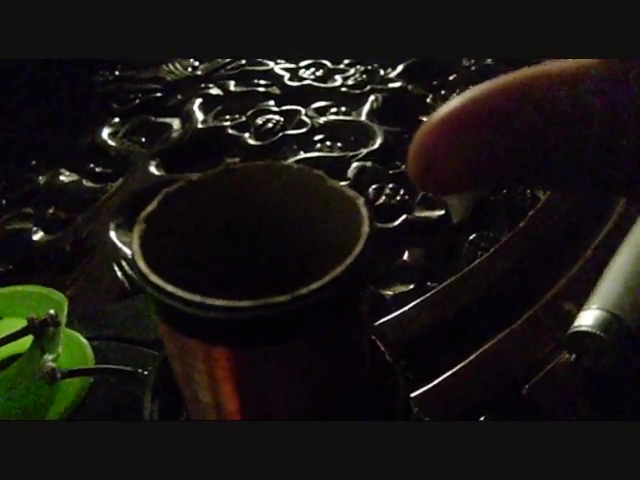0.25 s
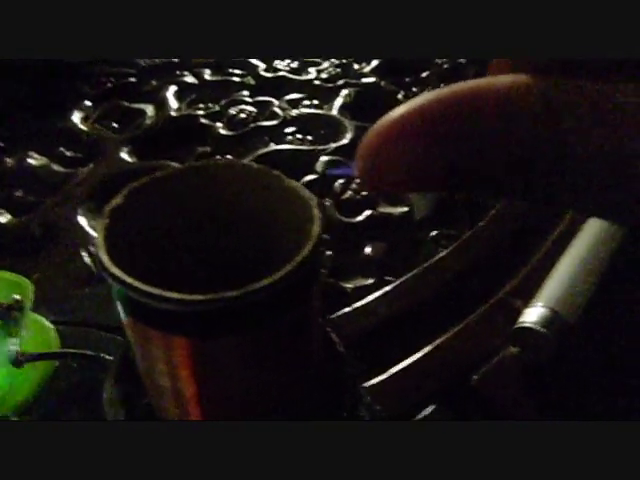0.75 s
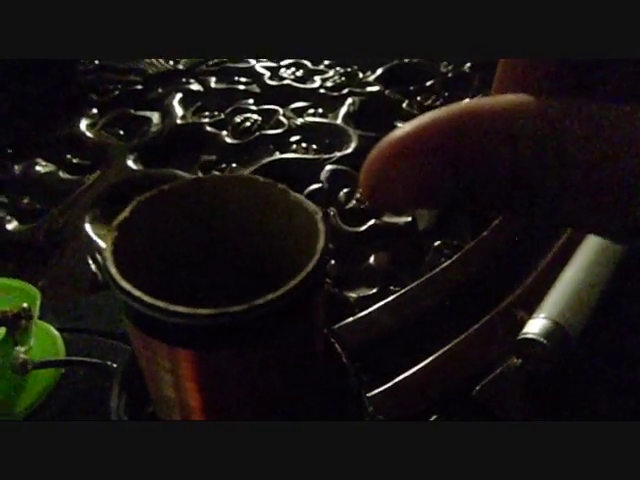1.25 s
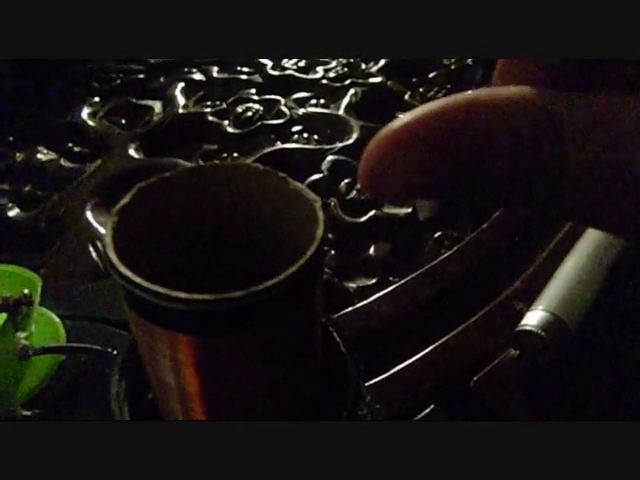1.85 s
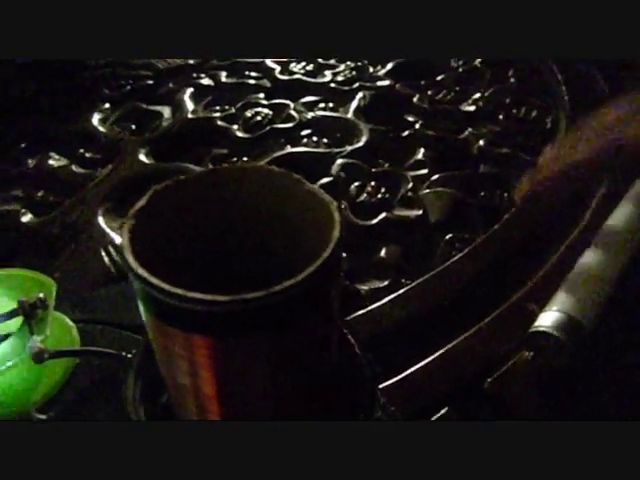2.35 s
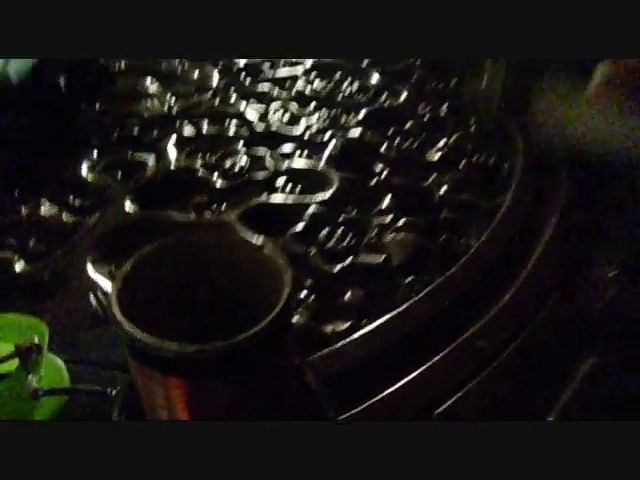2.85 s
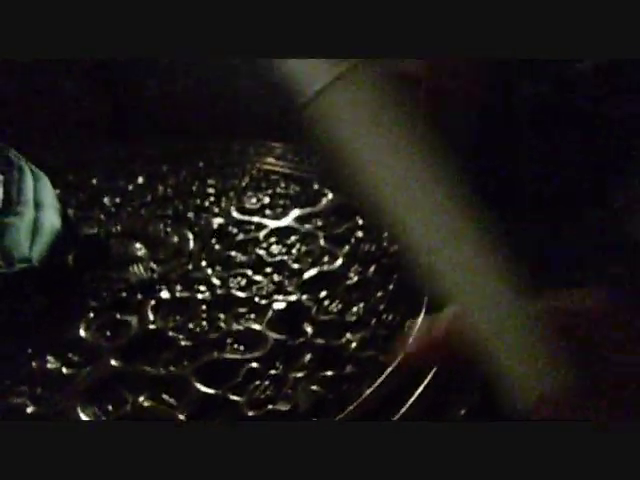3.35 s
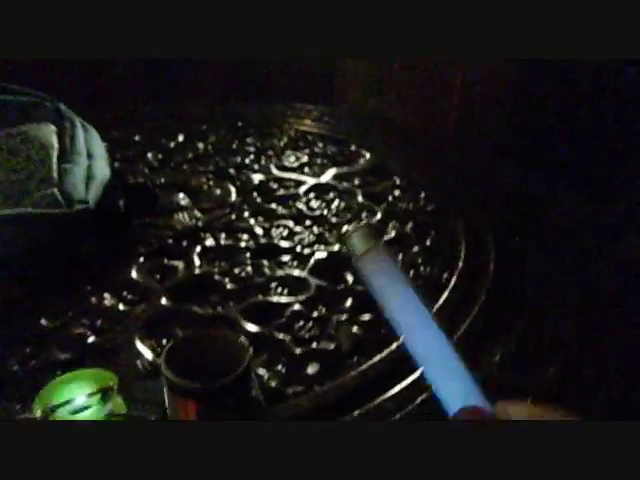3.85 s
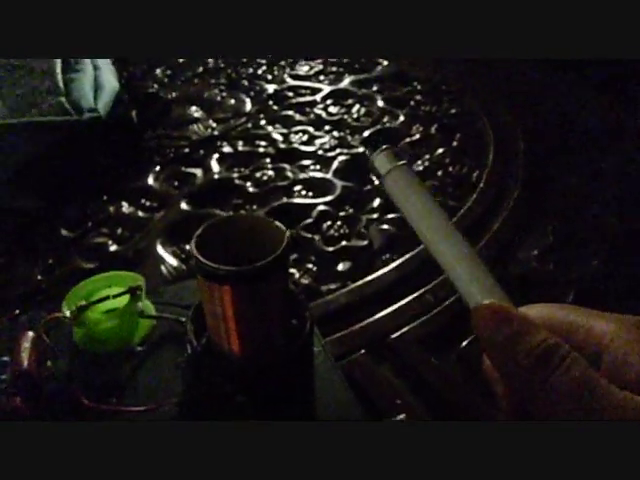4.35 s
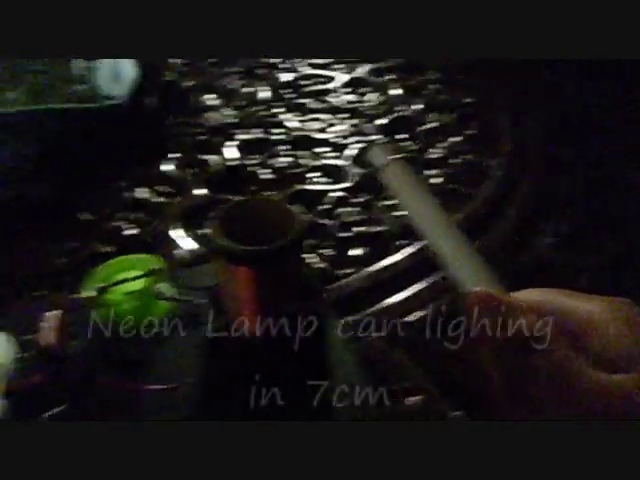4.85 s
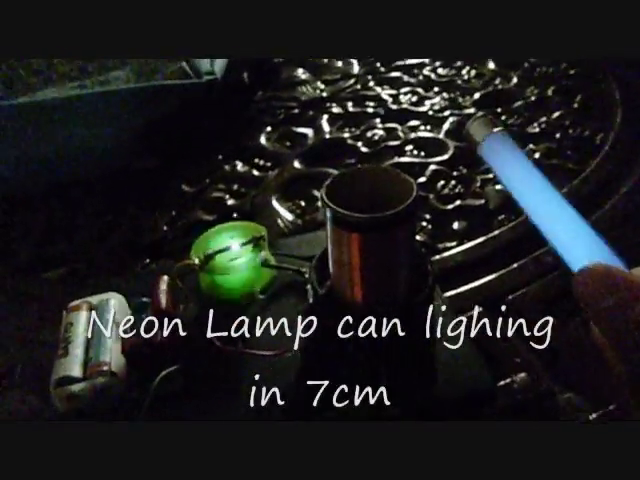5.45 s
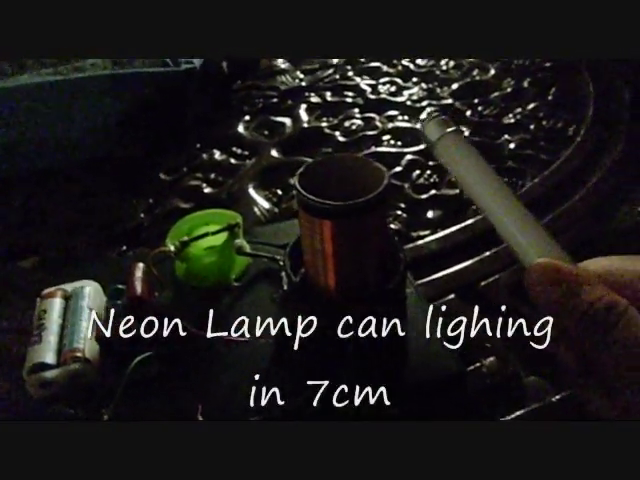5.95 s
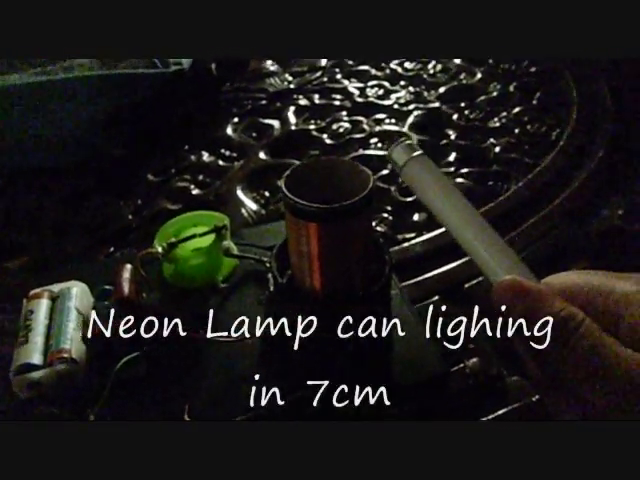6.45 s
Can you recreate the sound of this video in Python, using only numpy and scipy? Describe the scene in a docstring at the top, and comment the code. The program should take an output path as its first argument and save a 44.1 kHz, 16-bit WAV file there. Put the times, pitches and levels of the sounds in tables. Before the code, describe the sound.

A small spark coil on a metal tray snaps throughout, close to the microphone in a small quiet room: hard, bright, very short cracks at an even pace of nearly seven per second, slightly varied in colour, each with a high tubular ring, scattered near echoes and a brief hissy room tail. Low rumble and a soft airy motor whirr with faint wavering tones lie far beneath. From 2 s the whirr runs down, gone soon after 3 s. Soft hand bumps and a brushing rustle come at 1.9-2.4 s, then a cluster of light, hollow knocks at 2.5-2.7 s as a lamp tube is lifted, with tiny fingertip ticks at 3.0-3.5 s. From about 3.3 s the cracks are mostly weaker as the microphone draws back, apart from stronger ones near 3.7-3.9 s; they are softest after 6 s. A faint drone swells near 5 s, and a tiny rising creak comes at 5.6 s.

```python
"""Hard, bright cracks about seven times a second: a small spark coil on a metal tray, close to a camera.
Each crack is a shaped impulse that rings the mouth of the coil tube and bounces off the tray, with
scattered echoes from clutter, a wall and a small room. Beneath lie noise rumble, a faint drone and a
motor whirr (noise and wavering tones) that runs down from two seconds on. A lamp tube is picked up with
light knocks (decaying modes), a hand rustles and something creaks while the camera draws back."""
import sys
import numpy as np
from scipy import signal
from scipy.fft import rfft, irfft
from scipy.io import wavfile

SR = 44100
rng = np.random.default_rng(int(sys.argv[2]) if len(sys.argv) > 2 else 0)


def transcribe(u):
    """Save the signal u as a 16-bit wav file named by the first command-line argument.

    u: samples, shape (n,) or (channels, n), limited to [-1, 1]; the rate is SR.
    q: integer samples, one column per channel.
    """
    v = np.clip(np.atleast_2d(u).T, -1, 1)
    q = np.round(v * 32767).astype(np.int16)
    wavfile.write(sys.argv[1], SR, q)


N = 296352
TIME = np.arange(N) / SR


def gain_of(db):
    """Decibels to amplitude."""
    return 10 ** (np.asarray(db) / 20)


def evened(x):
    """Scales to rms 1."""
    return x / np.sqrt(np.mean(x ** 2) + 1e-20)


def faded(x):
    """Lets the second half of a short sound die to nothing."""
    return x * np.minimum(np.linspace(2, 0, len(x)), 1) ** 4


def read(points, hz, axis=1):
    """One column of a spectrum table, interpolated on a log-frequency axis."""
    columns = np.transpose(points)
    return np.interp(np.log(hz + 1), np.log(columns[0] + 1), columns[axis])


def follow(points, s):
    """All columns of a curve at the times s, in a list."""
    times, *columns = np.transpose(points)
    return [np.interp(s, times, c) for c in columns]


def add(mix, s, sound):
    """Mixes a sound in at time s, cut off where the mix ends."""
    part = mix[round(s * SR):][:len(sound)]
    part += sound[:len(part)]


def causal(db):
    """Minimum-phase spectrum: these gains, with all ringing after the start."""
    log_gain = np.log(gain_of(np.r_[db, db[-2:0:-1]]))
    return np.exp(np.conj(signal.hilbert(log_gain)))[:len(db)]


def coloured(x, points):
    """Filters a sound by the gains of a spectrum table."""
    hz = np.fft.rfftfreq(len(x), 1 / SR)
    return irfft(rfft(x) * causal(read(points, hz)), len(x))


def wander(rate_hz):
    """Random drift of rms 1: noise with little above rate_hz."""
    hz = np.fft.rfftfreq(N, 1 / SR)
    return evened(irfft(rfft(rng.standard_normal(N)) / (1 + (hz / rate_hz) ** 4), N))


def wavering(hz, sway_hz, rate_hz):
    """A sine whose pitch strays at random, by sway_hz rms."""
    pitch_hz = hz + sway_hz * wander(rate_hz)
    return np.sin(2 * np.pi * np.cumsum(pitch_hz) / SR)


def scatter(delay, t60, size=4096):
    """A dying cluster of random echoes, of energy 1; delay and t60 in s."""
    t = np.arange(size) / SR - delay
    echoes = rng.standard_normal(size) * (t > 0) * gain_of(-60 * abs(t) / t60)
    return echoes / np.linalg.norm(echoes)


def background():
    """Low room rumble of coloured noise, and a faint wavering drone that swells toward the end."""
    # colour of the still room: pitch_hz, relative density_db [dB per Hz]
    floor = [(15, -1), (45, 2), (64, 0), (110, -10.5), (170, -8), (250, -16), (330, -19), (900, -29.5),
             (3000, -24.5), (8000, -30), (16000, -48)]
    # rumble, stronger at first: time_s, level_db [rms, before its random drift]
    rumble_curve = [(0, -53), (.3, -53.5), (1, -53), (1.9, -57.5), (2.3, -57), (3.3, -57.5), (6.7, -60.5)]
    # drone: time_s, level_db [peak]
    drone_curve = [(0, -87), (4.5, -78), (5, -68), (6.7, -69)]
    noise = evened(coloured(rng.standard_normal(N), floor))
    rumble = noise * gain_of(follow(rumble_curve, TIME)[0] + 0.94 * wander(1.4))
    drone = gain_of(follow(drone_curve, TIME)[0]) * wavering(167, sway_hz=10.2, rate_hz=73.5)
    return rumble + drone


def motor():
    """Rushing air with a few wavering tones, fading ever faster as the motor runs down."""
    # colour of the rushing air: pitch_hz, relative density_db [dB per Hz]
    whirr = [(25, 13), (40, 6), (60, -11), (120, -17.5), (350, 2.5), (520, -4.5), (1100, 0.5), (1850, 4),
             (2650, -3.5), (3200, -2), (4500, -3), (7000, -6.5), (9500, -20), (15000, -28)]
    # tones: pitch_hz, level_db [rms, before random drift], sway_hz [rms]
    tone_list = [(41.3, -59.5, 3.4), (187, -67, 3.3), (349, -62.5, 8.16), (717, -63, 5), (907, -67, 2.2),
                 (1080, -66.5, 4.4), (1660, -71.5, 7.7), (1883, -63, 2.26)]
    air_db = -46.5  # rms
    off_s, rundown_s = 1.98, 1.29  # runs evenly, then loses 60 dB within the run-down time
    sound = gain_of(air_db) * evened(coloured(rng.standard_normal(N), whirr))
    for hz, db, sway in tone_list:
        level = gain_of(db + 2.7 * wander(4.7)) * np.sqrt(2)  # rms to peak
        sound += level * wavering(hz, sway_hz=sway, rate_hz=10.46)
    running_db = -60 * (np.maximum(TIME - off_s, 0) / rundown_s) ** 2
    return sound * gain_of(running_db)


def creak():
    """Uneven slipping: a faint, rough tone that climbs quickly, swells and dies away."""
    start_s, length_s, level_db = 5.57, 0.23, -63
    start_hz, end_hz, rise_s = 394, 635, 0.033
    t = np.clip(TIME - start_s, 0, length_s)
    hz = end_hz + (start_hz - end_hz) * np.exp(-t / rise_s)
    swell = np.sin(np.pi * np.sqrt(t / length_s))
    roughness = 1 + 1.2 * wander(70)
    return gain_of(level_db) * swell * roughness * wavering(hz, sway_hz=29.8, rate_hz=99)


def hand():
    """Short swells of narrow noise as the hand moves."""
    # soft bumps and a brush: start_s, length_s, centre_hz, width_hz, level_db [rms]
    rustles = [(1.928, 0.083, 316, 25, -51.5), (2.072, 0.19, 5600, 2030, -48.5),
               (2.43, 0.32, 193, 25, -58.5)]
    out, hz = np.zeros(N), np.fft.rfftfreq(SR, 1 / SR)
    for s, length, centre_hz, width_hz, db in rustles:
        band = 1 / (1 + (2 * (hz - centre_hz) / width_hz) ** 2)
        noise = irfft(rfft(rng.standard_normal(SR)) * band)[:round(length * SR)]
        swell = np.sin(np.pi * np.linspace(0, 1, len(noise)) ** 0.37)  # peaks early
        add(out, s, gain_of(db) * evened(noise * swell))
    return out


def lamp():
    """Light knocks ring the modes of lamp and tray; fingertip ticks are bright and damped."""
    # handling: start_s, relative level_db, treble tilt_db [per octave], free [factor on ring times]
    knocks = [(2.47, -37, 0.5, 1), (2.593, -39.5, -5.5, 0.61), (2.610, -41.5, -6, 0.8),
              (2.674, -42, 2, 0.51), (3.036, -70, 17, .25), (3.378, -54, -12.5, 0.24),
              (3.462, -72, 18, 0.25), (3.492, -72.5, 17.5, 0.25)]
    # modes of lamp and tray: pitch_hz, relative level_db, t60_s [before the factor above]
    modes = [(209, -14, 0.3), (436, -8, 0.18), (579, 4, 0.14), (680, 2, 0.1), (1003, 2, 0.21),
             (1050, 9.5, 0.071), (1240, 11, 0.059), (1690, -8, 0.07), (1990, 1, .045), (2300, -4, 0.065),
             (2840, 6, .04), (3100, 4, .045), (3710, -2, 0.046), (4500, 2, 0.041)]
    out, t = np.zeros(N), np.arange(SR // 3) / SR
    for s, db, tilt_db, free in knocks:
        ring = np.zeros(len(t))
        for k, (hz, mode_db, t60) in enumerate(modes):
            sign = (-1) ** k  # neighbouring modes start in opposite directions
            decay_db = mode_db + tilt_db * np.log2(hz / 1000) - 60 * t / (t60 * free)
            ring += sign * gain_of(decay_db) * np.sin(2 * np.pi * hz * t)
        rattle = coloured(scatter(0, 0.075 * free), [
            (100, -19 - 2 * tilt_db), (800, 9.5), (2800, 2.5 + 1.25 * tilt_db),
            (6000, -20 + 2 * tilt_db), (10500, -13), (15000, -29)])
        add(out, s, gain_of(db - 7) * ring)
        add(out, s, gain_of(db + 30.5) * faded(rattle))
    return out


def room(s, size=16384):
    """The room's answer to the spark at time s: a bounce off the nearest wall and a diffuse tail."""
    # what the room gives back: pitch_hz, level_db, t60_s
    room_tail = [(152, -26.5, 0.48), (1190, -19, 0.29), (2420, -14.5, 0.26), (3600, -6, 0.3),
                 (4080, -15.5, 0.24), (6100, -6, 0.31), (7500, -4.5, 0.27), (8940, -4, 0.27),
                 (11150, -12, 0.26), (15500, -15.5, 0.21)]
    # nearest wall's echo as the camera moves: time_s, delay_ms, level_db [before the room's colour]
    wall_path = [(0, 10.4, -2), (2.1, 11.9, -0.5), (2.5, 12, 1), (3.1, 11.9, -4.5), (6.7, 12, 1)]
    hz, t, z = signal.stft(rng.standard_normal(size), SR, nperseg=256)
    t60 = np.maximum(read(room_tail, hz, axis=2), .02)[:, None]
    # each band of noise decays at its own rate, with equal energy
    z *= gain_of(-60 * t / t60) * np.sqrt(2 * np.log(10 ** 3) / (t60 * SR))
    tail = signal.istft(z, SR, nperseg=256)[1][:size]
    tail *= np.minimum(np.arange(size) / SR / 0.017, 1)  # builds up over 17 ms
    delay_ms, wall_db = follow(wall_path, s)
    wall = coloured(scatter(delay_ms / 10 ** 3, 0.016), [(3500, -12.5), (6500, 0), (9000, -6), (12000, -11.0)])
    add(tail, 0, gain_of(wall_db) * wall)
    return faded(coloured(tail, room_tail))


def snap(s, crack_db, thump_db, bite_db, dip_hz, ripple, size=2048):
    """One spark heard directly: a shock with a rippled spectrum, the tube's ring and the tray's bounce."""
    # a bare crack: pitch_hz, relative level_db
    crack = [(40, 3.5), (200, 1.5), (1000, 3), (1700, 2), (2350, 1), (3100, 0), (4500, 0), (6000, 1),
             (8000, 1.5), (9900, -3), (11500, 4), (13700, 1.5), (14700, -24), (16000, -12.5)]
    # microphone moves off the tube's axis and turns: time_s, ring_db [before a 1 dB cut],
    # treble_db [at 12.7 kHz]
    aim = [(0, 13.5, -1), (1.7, 12, -2.5), (2.6, 10.5, -2), (3.7, 6, -3.5), (4.7, 11, 2), (5.3, 9.5, -2),
           (6.0, 3, 2.5), (6.7, 9, 4)]
    # bounce off the tray as the camera moves: time_s, delay_ms, level_db [before bass and top losses]
    tray = [(0, 1.1, -30), (2.2, 1.42, -8.5), (3.5, 1.06, -26), (6.7, 1.27, -11)]
    # all-pass smear that softens each crack's onset: pitch_hz, damping [ratio]
    smear_bands = [(9160, 0.21), (4036, 0.24)]
    ring_hz, ring_width_hz = 9025, 370  # cross mode of the air in the tube's mouth
    dip_db, dip_width_hz = -7.5, 303
    ripple_db, ripple_step_hz = 2.53, 400.8

    hz = np.fft.rfftfreq(size, 1 / SR)
    ring_db, treble_db = follow(aim, s)
    thump = thump_db / (1 + (hz / 2050) ** 8)
    bite = bite_db / (1 + ((hz - 3600) / 1450) ** 4)
    top = treble_db / (1 + ((hz - 12700) / 1900) ** 4)
    resonance = 1 / (1 + ((hz - ring_hz) / ring_width_hz) ** 2) ** 3
    ring = 10 * np.log10(1 + gain_of(ring_db - 1.0) ** 2 * resonance)
    dip = dip_db / (1 + ((hz - dip_hz) / dip_width_hz) ** 2)
    kinks = ripple_db * np.interp(hz / ripple_step_hz, np.arange(len(ripple)), ripple)
    z = causal(crack_db + read(crack, hz) + thump + bite + top + ring + dip + kinks)
    delay_ms, tray_db = follow(tray, s)
    # bass bends round the tray; its embossing scatters the top
    mirror = hz / (hz + 1000) / (1 + (hz / 9500) ** 4)
    z *= 1 + gain_of(tray_db) * mirror * np.exp(-2j * np.pi * hz * delay_ms / 10 ** 3)
    smear = np.ones(len(hz), complex)
    for smear_hz, damping in smear_bands:
        smear *= 1 - (hz / smear_hz) ** 2 + 1j * damping * hz / smear_hz
    return irfft(z * np.conj(smear) / smear)  # turns phase only, keeps every level


def coil():
    """Every spark with its echoes off the table's clutter and the room."""
    # sparks, each along another path through the air: start_s, crack_db, thump_db [low end],
    # bite_db [near 3.5 kHz]; thump and bite relative to the crack
    sparks = [(0.0076, 8.1, -8.5, 1.5), (0.1584, 10, -7, 4.5), (0.3054, 8.5, -5.5, 5),
              (0.4564, 11, -5.5, -3), (0.6125, 11.5, -11, -1.5), (0.7648, 9, -12, 0),
              (0.912, 10.3, -4, 1.5), (1.0617, 10, -14, -2.5), (1.2113, 12.5, -8.5, -4.5),
              (1.3513, 12.5, -8, 0), (1.4926, 10, -4, 0), (1.6355, 11, -7, 0.5), (1.7867, 12, -6.5, -8.5),
              (1.9336, 11, -5, -3.5), (2.0803, 11.5, -10, -5), (2.2285, 10.5, -10.5, -6),
              (2.3744, 10, -10.5, -5), (2.5195, 11.5, -9, -5.5), (2.6631, 12, -12, 0),
              (2.8069, 10.5, -11, -6.5), (2.9527, 8, -9.5, 4), (3.102, 8.5, -8, -5),
              (3.2519, 6, -8.5, -6.5), (3.4034, 6, -10, 3), (3.5564, 4, -19.5, -2.5),
              (3.7101, 10, -9, -11.5), (3.869, 8.5, -14.5, -11), (4.0176, 5.5, -13, 0),
              (4.1639, 4.5, -3, -7), (4.3119, 4.5, -12, 2.5), (4.4613, 6, -5, -13),
              (4.6095, 3.5, -11.5, 1.5), (4.755, 3.5, -6, -10), (4.9017, 4, -8.5, 1.5),
              (5.0498, 3.5, -9, -3), (5.195, 5, -12.5, 1.5), (5.3395, 7, -7, -10.5), (5.4905, 4, -8, 1.5),
              (5.6374, 4.5, -8, 3), (5.7914, 3.5, -11, 3.5), (5.9465, 4, -16.5, 2.5),
              (6.0986, 0, -2.5, -1.5), (6.2552, 0.5, -6.5, 9), (6.402, 1, -5, -0.5), (6.5602, 0, -4.5, 4),
              (6.711, 0.5, -7, 2)]
    # colour of the clutter on the table: pitch_hz, relative level_db
    clutter_colour = [(200, -18), (2000, -17.5), (2900, -5), (3350, -0.5), (4000, -13), (6000, -5.5),
                      (9000, -5.5), (12500, -13), (15500, -8.5)]
    # echoes hardly change with distance: they follow only a share of the crack's level in dB
    clutter_db, room_db, echo_share = 3.0, -0.5, 0.27
    dip_low_hz, dip_high_hz = 2390, 5790  # below or above the bite, before random spread
    out = np.zeros(N)
    # two patterns of echoes: each has near things, then the table's far side
    first, second = (scatter(.0003, 0.032) + gain_of(-23) * scatter(0.0076, 0.017) for _ in range(2))
    for s, crack_db, thump_db, bite_db in sparks:
        # a dip drawn at random, below or above the bite, varies each crack's colour
        dip_hz = rng.choice([dip_low_hz, dip_high_hz]) * np.exp(.08 * rng.standard_normal())
        ripple = rng.standard_normal(size=40)
        add(out, s, faded(snap(s, crack_db, thump_db, bite_db, dip_hz, ripple)))
        turn = 2 * s  # radians: the pattern changes slowly as the camera drifts
        clutter = np.cos(turn) * first + np.sin(turn) * second
        echo_db = echo_share * crack_db
        add(out, s, gain_of(clutter_db + echo_db) * faded(coloured(clutter, clutter_colour)))
        add(out, s, gain_of(room_db + echo_db) * room(s))
    return out


def scene():
    """All sources at one microphone."""
    return (coil() + lamp() + hand() + creak() + motor() + background())[None]


def record(dry):
    """The microphone rounds the tallest peaks; then the band limit and a small steady offset."""
    ceiling, edge_hz = 0.95, 16150
    rounded = ceiling * np.tanh(dry / ceiling)
    low_pass = signal.firwin(255, edge_hz, window=("kaiser", 8), fs=SR)
    return signal.oaconvolve(rounded, low_pass[None], "same") + .0098


dry = scene()
out = record(dry)
transcribe(out)
```